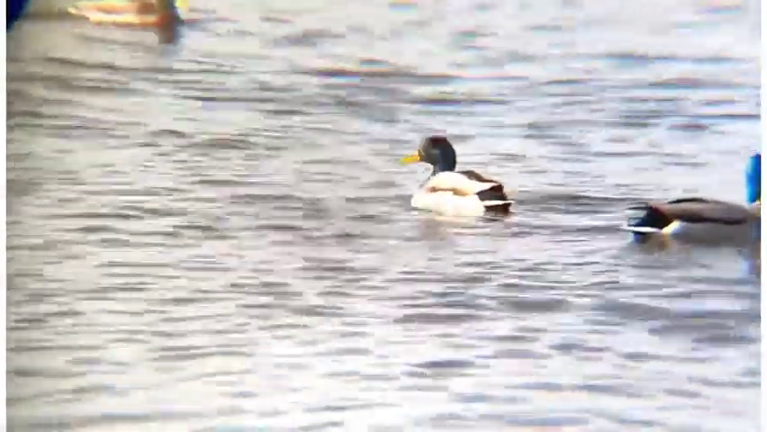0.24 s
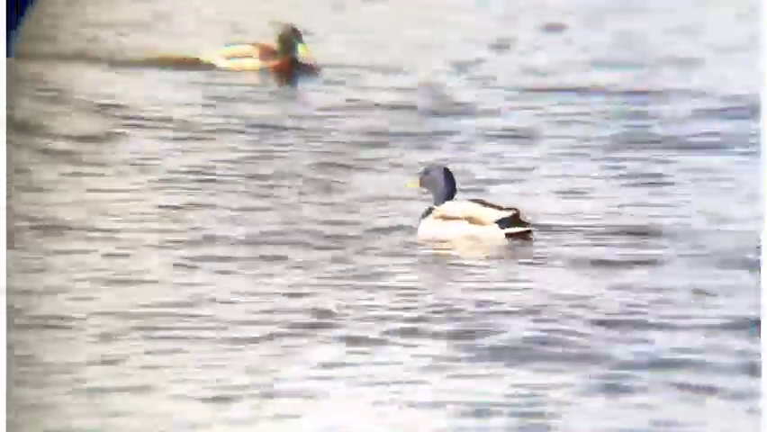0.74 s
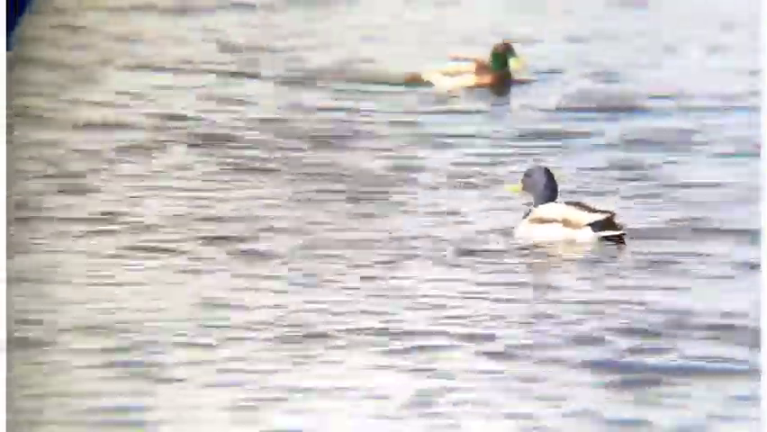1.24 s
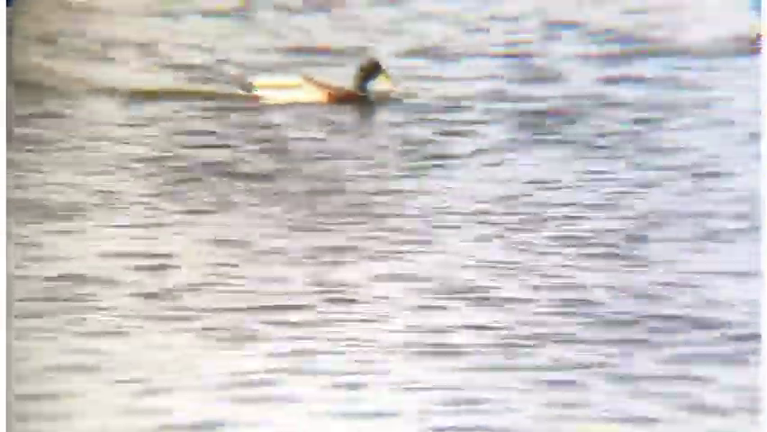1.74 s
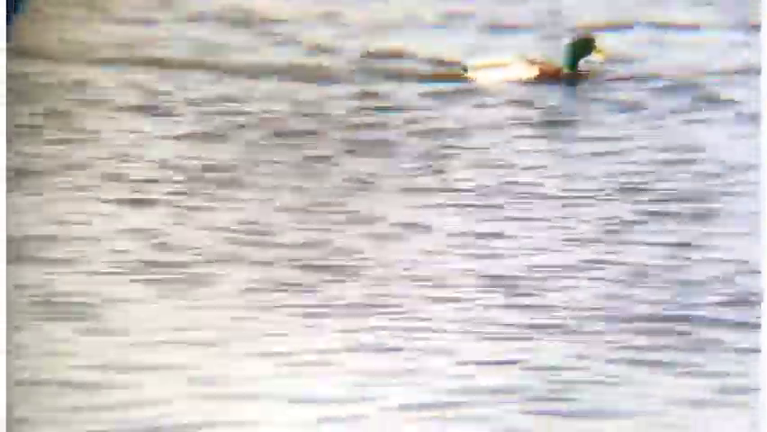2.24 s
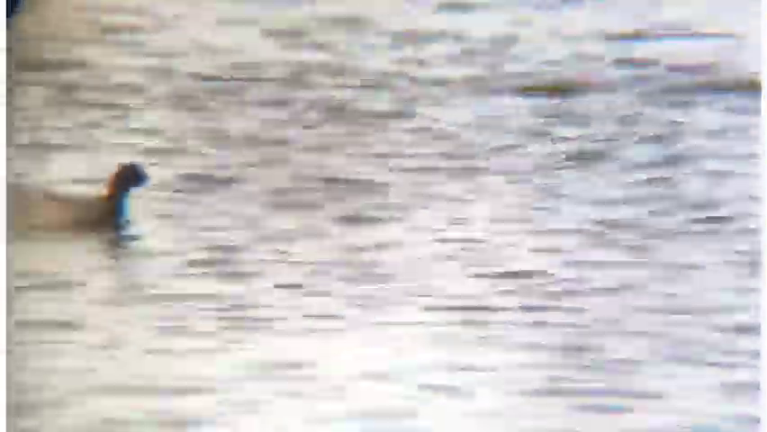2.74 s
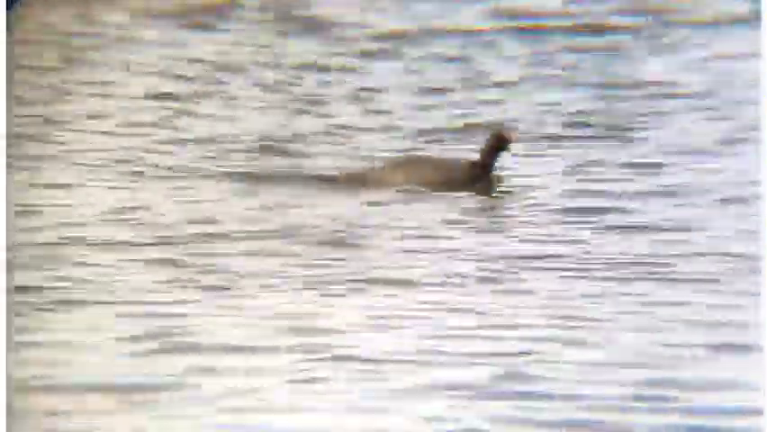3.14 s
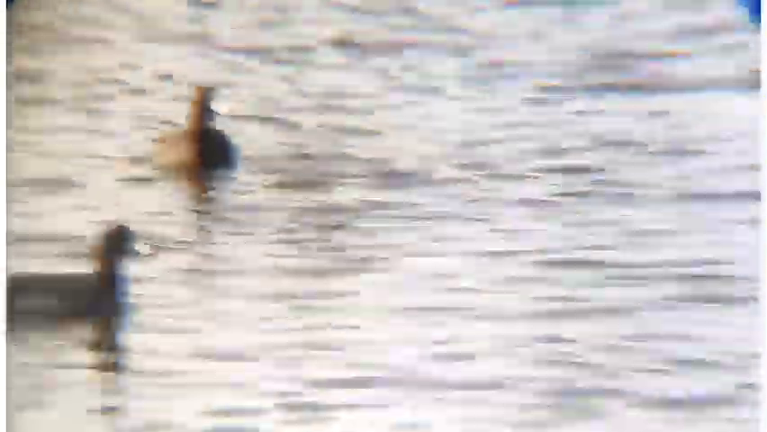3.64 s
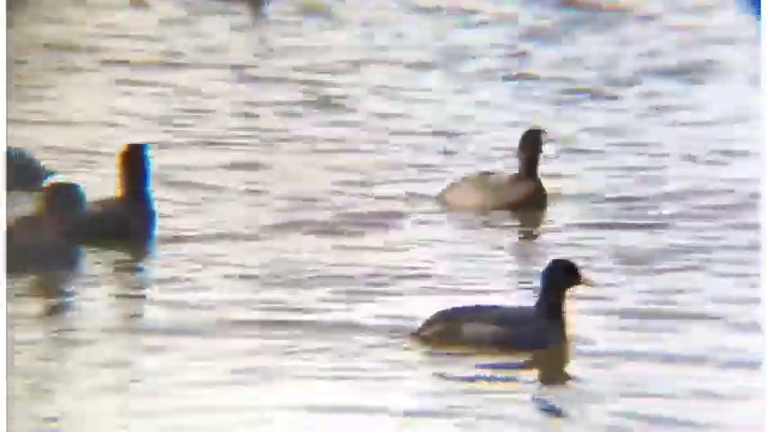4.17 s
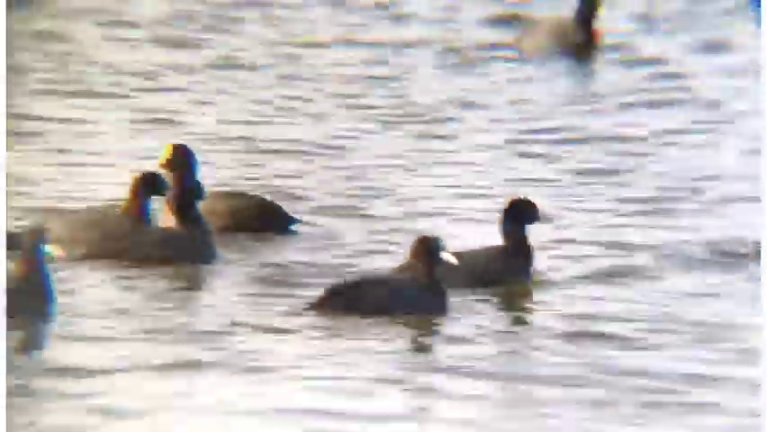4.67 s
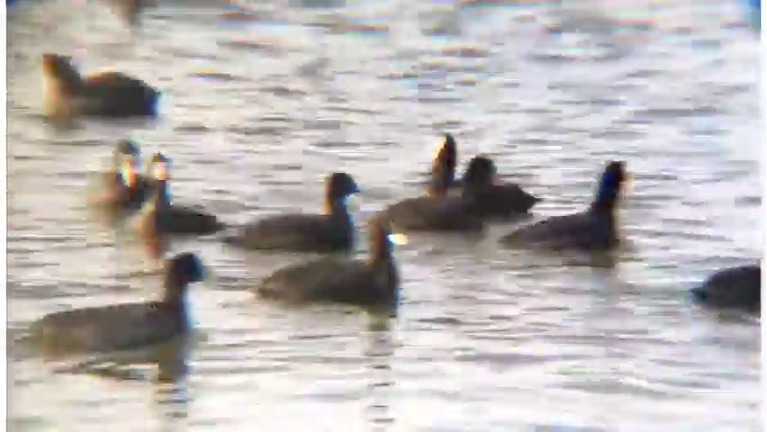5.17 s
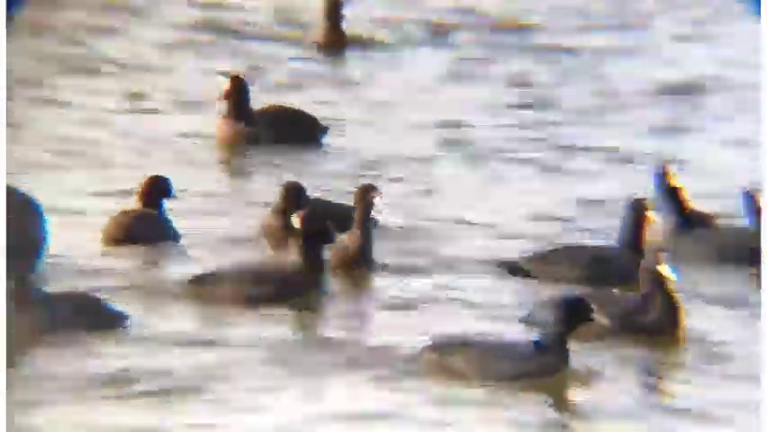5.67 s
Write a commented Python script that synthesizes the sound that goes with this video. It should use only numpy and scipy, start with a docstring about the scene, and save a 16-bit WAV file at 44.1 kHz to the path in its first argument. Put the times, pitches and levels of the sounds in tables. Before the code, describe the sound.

An open pond heard through a handheld stereo device. A quick burst of ticks and a brief low swell open it, then faint rumble and soft water wash continue, the wash slowly thinning. A coot calls at about 0.2, 0.85, 1.35, 1.8, 2.3, 2.8, 3.25, 3.7, 4.2, 4.7 and 5.2 seconds: tiny clear notes around 850 to 900 hertz, reedy with overtones, sagging slightly in pitch, some starting with a small octave break. Very short dry pops hit the right side irregularly, densest from 2.3 to 3.3 seconds. Bright rustle and finger rubs come and go, strongest early and near 4 and 4.8 seconds. Wind thumps low on the left from 2.3 to 2.8 seconds, with a weaker gust near 5.6. Two thin, distant songbird chirps come at 2.5 and 2.7. A hard plastic clack strikes at 4.85, a very faint one at 5.5, and a sharp tick near the end.

```python
"""Short, clear, falling coot notes come over an open pond, with far rumble and a wash of water behind them.
Close by, sharp taps pop in the right microphone port; the handled device rustles, ticks and clacks.
Wind buffets the left port and a far songbird chirps twice. Coot and songbird are gliding sines, rumble, wash
and rubbing are banded noise, ticks and clacks are struck resonances, taps and eddies are pressure pulses."""
import sys
import numpy as np
from scipy import signal
from scipy.io import wavfile

SR = 44100
rng = np.random.default_rng(int(sys.argv[2]) if len(sys.argv) > 2 else 0)


def volts_from_decibels(level):
    """Turn decibel levels (scalar or array-like) into linear amplitude factors."""
    exponent = np.asarray(level, float) / 20
    return 10 ** exponent


def transcribe(u):
    """Save the signal u as a 16-bit wav file named by the first command-line argument.

    u: samples, shape (n,) or (channels, n), limited to [-1, 1]; the rate is SR.
    q: integer samples, one column per channel.
    """
    v = np.clip(np.atleast_2d(u).T, -1, 1)
    q = np.round(v * 32767).astype(np.int16)
    wavfile.write(sys.argv[1], SR, q)


N = 260631   # samples

# stereo image of the distant noise: f/Hz, left-right likeness (1 = same, -1 = opposite)
PORT_LIKENESS = [(30, 1), (60, 1), (120, 1), (240, 1), (470, 0.77), (940, 0.58), (1860, 0.3), (3700, -0.14),
                 (7350, 0.49), (14600, 0.66)]
# balance of the two ports for noise: f/Hz, left over right level/dB
PORT_LEAN = [(60, 0), (150, -1.5), (370, -3), (940, 1), (2340, -3), (5850, -2), (14600, -2)]

# far rumble, spectrum shape: f/Hz, relative density level/dB per Hz
RUMBLE_SPECTRUM = [(10, 11), (20, -12.5), (40, -4), (65, 1), (112, -10.5), (200, -13), (300, -23),
                   (400, -29)]
# a steady rumble, plus a swell at the start that dies away with this time constant
RUMBLE_DB, RUMBLE_START_DB, RUMBLE_START_S = -51, -37, 0.017
# water wash, level over time: t/s, level/dB
WASH_LEVEL = [(0, -52.5), (.2, -56.5), (.54, -54), (.8, -55), (1.3, -54.5), (1.7, -53.5), (2.2, -55),
              (2.5, -55.5), (2.9, -57.5), (3.26, -56.5), (3.5, -59), (4.5, -59.5), (5.1, -57.5),
              (5.91, -60)]
# water wash, spectrum shape: f/Hz, relative density level/dB per Hz
WASH_SPECTRUM = [(120, 2.5), (200, -5), (255, 2), (311, -2), (536, -14), (575, -18), (661, -12.5),
                 (1540, -15), (3200, -32), (4160, -42), (7040, -120)]
# rustling hiss, level over time: t/s, level/dB
HISS_LEVEL = [(0, -68), (.2, -63.5), (.72, -64), (1.05, -69), (1.35, -64.5), (1.76, -65), (2.15, -68.5),
              (2.42, -64.5), (2.62, -68.5), (2.95, -66.5), (3.14, -65.5), (3.45, -71), (3.9, -68),
              (4.13, -68), (4.3, -68.5), (4.89, -67), (5.3, -68.5), (5.91, -71.5)]
# rustling hiss, spectrum shape: f/Hz, relative density level/dB per Hz
HISS_SPECTRUM = [(1290, -17.5), (2200, -0.5), (2560, -9.5), (5160, -11), (6560, -12.5), (9100, -19.5),
                 (13800, -17), (14800, -24)]
NOISE_TOP_HZ = 14650

# fingers rubbing the casing: start t/s, length/s, level/dB
RUB_SLIDES = [(.11, 0.15, -68), (0.36, 0.12, -64), (0.487, 0.037, -65.5), (0.577, 0.056, -61),
              (0.712, 0.056, -67), (1.277, 0.049, -62.5), (1.356, 0.062, -61), (1.776, 0.038, -62.5),
              (2.843, 0.023, -60), (2.914, 0.039, -63), (2.973, 0.12, -63.5), (3.695, 0.027, -59.5),
              (3.96, 0.12, -58), (4.104, 0.046, -67), (4.178, 0.05, -68), (4.666, 0.075, -65),
              (4.752, 0.033, -61), (4.835, 0.045, -56.5), (4.958, 0.031, -60), (5.163, 0.039, -63),
              (5.856, 0.015, -71)]
# rubbing, spectrum shape: f/Hz, relative density level/dB per Hz
RUB_SPECTRUM = [(880, -32), (1500, 0), (2270, 7), (2720, -12), (3440, 5), (4440, 11), (5730, -27),
                (7250, 6), (14300, -6)]
# small ticks: t/s, level/dB, left over right level/dB, colour f/Hz, decay of the crack t60/s (2 ms at least)
TICK_EVENTS = [(.014, -41, 5, 570, 0.066), (.043, -50, 3, 1390, 0.017), (0.056, -37, 8, 1000, 0.03),
               (.074, -38, -6, 730, 0.0083), (0.088, -39.5, -1.5, 1580, 0.019),
               (0.224, -42, -6, 6840, 0.045), (0.3077, -49, -2.5, 3660, .017),
               (.369, -45, 2.5, 1010, 0.0081), (0.3918, -42.5, -3.5, 3700, 0.014),
               (.498, -39.5, -6, 1250, 0.031), (1.016, -43, -6, 1670, 0.013), (1.28, -44, -6, 7200, 0.028),
               (1.336, -48.5, -3, 4600, 0.016), (1.51, -41, -7, 5300, 0.035),
               (1.8646, -44.5, -21, 7000, 0.0034), (1.928, -58, 1.5, 4240, .013),
               (2.8664, -50, -17, 8300, .008), (3.351, -48, 2, 6450, 0.023),
               (3.841, -48, -18, 7040, 0.0057), (4.567, -50.5, -19, 7300, .014),
               (4.951, -49, -17, 4030, .012), (4.9697, -50.5, -22, 4120, 0.016),
               (5.1901, -56.5, -38, 3800, .012), (5.3754, -51, -22, 6500, 0.029),
               (5.8487, -48, -10, 7200, 0.11), (5.866, -31, -11, 11800, 0.0022)]
FAINT_TICKS_PER_S, FAINT_TICK_DB = 1.2, -58   # more ticks at random moments
# casing clacks: start t/s, rms level/dB, rattle length/s
CLACK_EVENTS = [(4.8496, -31.5, 0.019), (5.482, -58.5, 0.03)]
# resonances of the plastic casing: f/Hz, relative level/dB, t60/s
CASING_MODES = [(330, -21, 0.0076), (1070, -36, 0.016), (1250, 17.5, 0.011), (1540, 0.5, 0.0068),
                (2540, -32, 0.0048), (3960, 4, 0.014), (4600, 3, 0.0077), (6700, -29, .01),
                (7230, 10.5, 0.0082), (8800, 6, 0.006), (10800, -15, .005), (11600, 2, 0.0084),
                (12700, -9, 0.0057)]

# gusts on the left port: t of peak/s, peak level/dB
GUST_PEAKS = [(1.1, -67), (1.85, -57), (2.34, -55), (2.58, -45.5), (2.78, -43.5), (2.87, -57), (5.6, -51)]
BREEZE_DB, GUST_RISE_DB_PER_S, GUST_FALL_DB_PER_S = -60.5, 261, 250
# single eddies thumping the left port: t/s, bump level/dB before the vent, width/s
EDDY_BUMPS = [(2.303, -28, 0.0023), (2.341, -28, .004), (2.356, -27, 0.0026), (2.401, -30.5, 0.0024),
              (2.505, -41, 0.0024), (2.525, -32, 0.0035), (2.752, -29, 0.0032), (2.771, -28, 0.004)]

# both birds at the two ports: f/Hz, right over left level/dB, lag of the right port/rad
BIRD_PORTS = [(810, -2, 0.82), (1710, 5.5, 0.12), (2400, 1, 1.26), (3500, 1.5, 1.6)]
# far songbird: start t/s, length/s, start f/Hz, top f/Hz, end f/Hz, loudest level/dB
BIRD_CHIRPS = [(2.535, 0.036, 4600, 5900, 5600, -67), (2.667, 0.039, 5220, 5750, 3500, -62.5)]

# taps on the right port: t/s, push level/dB without tip, contact time/ms, share of bounce, share of sharp tip
TAPS = [(0.46, -27.5, 0.068, 0.11, 0.56), (0.4623, -18, 0.0052, 0.36, 0.7), (0.7183, -33.5, 0.13, 1, 0.2),
        (0.7192, -19, 0.016, 0.09, 1.6), (1.6166, -15.5, 0.07, 0.17, 0.85),
        (1.6757, -17.5, 0.069, 0.4, 0.53), (1.9113, -15, 0.053, 0.25, 0.4),
        (2.2931, -24.5, 0.0077, 0.15, 0.55), (2.30066, -15.5, 0.032, 0.3, 2.56),
        (2.30075, -12.5, 0.016, 0.29, 0.6), (2.3474, -18, 0.074, 0.17, 0.74),
        (2.395, -14.5, 0.058, 0.24, 0.74), (2.4953, -29, 0.19, 0.1, 0.09), (2.8612, -30, 0.014, 0.2, 0.6),
        (2.888, -11.5, 0.056, 0.24, 1.33), (2.924, -21, 0.09, 0.18, 0.76), (3.0071, -21.5, 0.1, 0.16, 0.86),
        (3.116, -35, 0.3, 0.1, 0.12), (3.26, -11.5, 0.042, 0.42, 0.59), (3.8266, -27, 0.15, 0.093, 1.06),
        (3.9425, -16.5, 0.071, 0.19, 1.05), (4.3176, -17.5, 0.09, 0.035, 0.69),
        (4.4416, -18.5, 0.068, 0.24, 0.62), (4.7223, -19.5, 0.084, 0.18, 0.49),
        (5.0153, -19, 0.064, 0.24, 0.78), (5.1187, -30.5, 0.11, 0.35, 0.2),
        (5.3425, -16, 0.043, 0.53, 0.38), (5.4819, -16.5, 0.027, 0.53, 0.2),
        (5.7501, -17, 0.027, 0.51, 0.17)]
# resonances of the port cavity: f/Hz, level over the push/dB, t60/s (3 ms at most)
PORT_MODES = [(3700, -27, 0.001), (7800, -14.5, 0.004)]
PORT_CUT_HZ = 12500

# coot notes: start t/s, length/s, top f/Hz, level/dB, depth of overtone dip/dB, place of dip/share of length
COOT_NOTES = [(0.221, 0.05, 894, -48.5, 2, 0.027), (0.854, 0.065, 877, -44, 3.5, 0.41),
              (1.345, 0.028, 832, -49, 7, 0.22), (1.778, 0.058, 894, -44, 3, 0.3),
              (2.289, 0.035, 855, -45.5, 1.5, 0.25), (2.779, 0.056, 901, -43, 5, 0.35),
              (3.25, 0.033, 845, -45.5, 13, 0.089), (3.698, 0.057, 904, -46, 9, 0.38),
              (4.196, 0.053, 876, -45, 4, 0.31), (4.671, 0.058, 930, -46.5, -1, 0.45),
              (5.169, 0.032, 847, -48.5, 7, 0.46)]
# voice breaks about an octave up, before some notes:
# start t/s, length/s, start f/Hz, end f/Hz, peak level/dB, overtone over it level/dB
VOICE_BREAKS = [(0.202, 0.021, 1800, 1715, -56, -24), (1.336, 0.017, 1447, 1513, -46.5, -30),
                (2.275, 0.019, 1520, 1630, -46, -32), (3.236, 0.019, 1436, 1686, -49.5, -32),
                (5.155, 0.019, 1500, 1553, -44.5, -12.5)]
# harmonics of a note: multiple of f, level over the note's/dB, fade/dB per s, share of the dip
NOTE_HARMONICS = [(1, -2, 66, 0.074), (2, -3, 2, 1.0), (3, -8, 100, 0.95), (4, -21.5, 60, 0.35),
                  (5, -26, 160, .6), (6, -27, 162, .6), (8, -23.5, 162, 0.55)]
NOTE_ATTACK_S, NOTE_RELEASE_S, NOTE_FADE_DB = 0.0036, 0.018, 0.5
# pitch scoops up from below, then sags toward a near-common end
SCOOP_HZ, SCOOP_S, END_HZ, SAG_BEND = 31.8, 0.005, 782, 1.22
END_FOLLOWS = 0.18   # higher notes end a little higher: Hz per Hz of top pitch above 860
DIP_WIDTH = 0.097   # share of the note's length
THROAT_HZ, THROAT_WIDTH_HZ, THROAT_DB = 3430, 86, 9   # lifts an overtone that passes it


def rms_one(x):
    """Scales to rms 1."""
    return x / np.sqrt(np.mean(x ** 2) + 1e-20)


def in_time(rows, t):
    """Columns of a curve, read at times t."""
    s, *columns = np.transpose(rows)
    return [np.interp(t, s, column) for column in columns]


def at_hz(points, hz, axis=1):
    """A spectrum column, read on a log-frequency axis."""
    points = np.array(points)
    return np.interp(np.log(hz), np.log(points[:, 0]), points[:, axis])


def drift(rate):
    """Slow random wandering of rms about 1: noise smoothed by two equal poles, faster for a higher rate/Hz."""
    pole = np.exp(-80 * np.pi * rate / SR)   # runs at one fortieth of the sample rate
    white = rng.standard_normal(N // 40 + 2002)
    slow = signal.lfilter([1], [1, -2 * pole, pole * pole], white)[2000:]
    return np.interp(np.arange(N) / 40, np.arange(len(slow)), rms_one(slow))


def ring(x, hz, t60):
    """A two-pole resonance: a unit click sets a decaying sine ringing."""
    radius, turn = volts_from_decibels(-60 / (t60 * SR)), 2 * np.pi * min(hz, .45 * SR) / SR
    return signal.lfilter([0, np.sin(turn)], [1, -2 * radius * np.cos(turn), radius ** 2], x + 1e-18)


def add(out, s, piece):
    """Lays a piece into the track at time s."""
    i = max(int(s * SR), 0)
    out[..., i:i + piece.shape[-1]] += piece[..., :N - i]


def left_right(left_db, right_db):
    """Gains of the two ports."""
    return volts_from_decibels(np.array([[left_db], [right_db]]))


def banded_noise(spectrum, patchy_db, grain_db):
    """Stereo noise of rms 1 in about third-octave bands, each with its level, flicker, lean and likeness."""
    low, top = spectrum[0][0], min(spectrum[-1][0], .45 * SR)
    edges = np.geomspace(low, top, int(3 * np.log2(top / low)))
    out, together, white = 0, drift(23.5), rng.standard_normal((2, 2, N))
    for k, (a, b) in enumerate(zip(edges, edges[1:])):
        band = signal.butter(2, [a, b], "band", fs=SR, output="sos")
        mid, side = signal.sosfilt(band, white[k % 2])   # neighbouring bands use separate noise
        hz = np.sqrt(a * b)
        alike = np.clip(at_hz(PORT_LIKENESS, hz), -.99, .99)
        gain = volts_from_decibels(at_hz(spectrum, hz) + patchy_db * drift(5.2) + grain_db * together)
        lean_db = at_hz(PORT_LEAN, hz)
        stereo = np.sqrt(1 + alike) * mid + np.sqrt(1 - alike) * side * [[1], [-1]]
        out = out + gain * left_right(lean_db / 2, -lean_db / 2) * stereo
    return rms_one(out)


def partial(hz, db, turn):
    """One gliding sine from a bird; the ports hear it with unlike level and phase."""
    phase = 2 * np.pi * (np.cumsum(hz) / SR + turn)
    right = volts_from_decibels(at_hz(BIRD_PORTS, hz)) * np.sin(phase - at_hz(BIRD_PORTS, hz, axis=2))
    return np.sqrt(2) * volts_from_decibels(db) * np.array([np.sin(phase), right])


def rumble(t):
    """Far low noise, steady after the opening swell has died exponentially."""
    level = volts_from_decibels(RUMBLE_DB) + volts_from_decibels(RUMBLE_START_DB) * np.exp(-t / RUMBLE_START_S)
    return level * banded_noise(RUMBLE_SPECTRUM, patchy_db=1.7, grain_db=-1.4)


def wash(t):
    """Water wash: patchy noise, mostly low, whose level wanders."""
    return volts_from_decibels(in_time(WASH_LEVEL, t)[0]) * banded_noise(WASH_SPECTRUM, patchy_db=2.0, grain_db=2.5)


def rustle(t):
    """The handled device rustles: bright noise that comes and goes."""
    return volts_from_decibels(in_time(HISS_LEVEL, t)[0]) * banded_noise(HISS_SPECTRUM, patchy_db=.8, grain_db=.8)


def songbird():
    """Thin arched whistles: up to the top pitch where they are loudest, then down."""
    out = np.zeros((2, N))
    for (s, length, start_hz, top_hz, end_hz, db), top_at in zip(BIRD_CHIRPS, (.75, .28)):
        t = np.arange(0, length, 1 / SR)
        arch = [(0, start_hz, db - 9), (top_at * length, top_hz, db), (length, end_hz, db - 24)]
        add(out, s, partial(*in_time(arch, t), rng.random()))
    return out


def buffet(t):
    """Lumpy low pressure, mostly on the windward left port: a breeze, and gusts that swell and fall quickly."""
    band = signal.butter(2, [15, 120], "band", fs=SR, output="sos")
    low = rms_one(signal.sosfilt(band, rng.standard_normal(N)))
    push = volts_from_decibels(BREEZE_DB)
    for s, db in GUST_PEAKS:
        below_peak_db = np.where(t < s, GUST_RISE_DB_PER_S * (s - t), GUST_FALL_DB_PER_S * (t - s))
        push = push + volts_from_decibels(db - below_peak_db)
    return push * volts_from_decibels(0.32 * drift(38)) * low * left_right(0, -17)


def eddies(t):
    """Each eddy is a pressure bump; the vent, a 22 Hz high-pass, lets it swing back below rest."""
    bumps = sum(volts_from_decibels(db) * np.exp(-((t - s) / width) ** 2) for s, db, width in EDDY_BUMPS)
    return signal.lfilter(*signal.butter(1, 22, "high", fs=SR), bumps) * left_right(0, -12)


def rubs(t):
    """Dry friction: grainy bright noise that starts and stops with each slide of the fingers."""
    slide = 0
    for s, length, db in RUB_SLIDES:
        to_edge = np.minimum(t - s, s + length - t)
        slide = slide + volts_from_decibels(db) * np.clip(to_edge / 0.0067, 0, 1)
    return slide * banded_noise(RUB_SPECTRUM, patchy_db=1.5, grain_db=1.2)


def faint_ticks():
    """Rows of weak ticks at random moments, louder on the right, coloured near 4 or 7 kHz."""
    wait, level, pan, pitch, detune = rng.random((60, 5)).T
    s = np.cumsum(-np.log(1 - wait)) / FAINT_TICKS_PER_S
    db = FAINT_TICK_DB + 6 * (level - .5)
    hz = np.where(pitch < .5, 4000, 7000) * (.9 + .2 * detune)
    rows = np.c_[s, db, -18 * pan, hz, np.full(60, .011)]
    return rows[s < N / SR].tolist()


def ticks():
    """Each tick is a decaying crack of noise coloured broadly around its pitch, plus a longer ring there."""
    out, t = np.zeros((2, N)), np.arange(1500) / SR
    for s, db, pan_db, hz, t60 in TICK_EVENTS + faint_ticks():
        crack = rng.standard_normal(len(t)) * volts_from_decibels(-60 * t / max(t60, .002))
        broad, rings = ring(crack, hz, 3.9 / hz), ring(crack, hz, 0.012)
        sound = .5 * broad / abs(broad).max() + 0.25 * rings / abs(rings).max()
        add(out, s, left_right(db + pan_db / 2, db - pan_db / 2) * sound)
    return out


def clacks():
    """A blow and a quick rattle of contacts ring the plastic casing; the left port hears it first."""
    out, ms = np.zeros((2, N)), np.arange(int(.08 * SR)) / SR * 1e3
    for s, db, length in CLACK_EVENTS:
        swell = np.sin(np.pi * np.clip(ms / (length * 1e3), 0, 1) ** 1.3)
        rattle = swell * (rng.random(len(ms)) < .4)
        around_blow = np.exp(-abs(ms - 3.2) / np.where(ms < 3.2, .5, .6))
        hits = rng.standard_normal(len(ms)) * (around_blow + 1.03 * rattle)
        hits[int(3.2e-3 * SR)] = -15   # the blow itself
        casing = 0
        for hz, mode_db, t60 in CASING_MODES:
            port_db = mode_db + rng.normal(0, 0.99, (2, 1)) + [[hz / 1400], [0]]   # left is brighter
            casing = casing + volts_from_decibels(port_db) * ring(hits, hz, t60)
        scrape = rng.standard_normal((2, len(ms))) * np.clip(abs(hits), 0, 1.5)
        sound = rms_one(casing) + volts_from_decibels(-7.0) * rms_one(scrape)
        sound = signal.lfilter(*signal.butter(2, 850, "high", fs=SR), sound)   # too small to boom
        sound[1] = volts_from_decibels(4) * np.roll(sound[1], 20)   # right port: 20 samples later
        add(out, s, volts_from_decibels(db) * rms_one(sound))
    return out


def dent(ms, contact_ms, tip):
    """Inward push of one contact: a pulse slower to rise than to fall, with a very short sharp tip."""
    pulse = 1 / np.cosh(ms / np.where(ms < 0, 1.55 * contact_ms, contact_ms))
    return -pulse - tip * np.exp(-(ms / 0.011) ** 2)


def pops():
    """A tap pushes the diaphragm in and bounces once; the trapped air swings it back and the port rings."""
    push, t = np.zeros(N), np.arange(-90, 90) / SR * 1e3   # t in ms
    for s, db, contact_ms, bounce, tip in TAPS:
        late = (s * SR % 1) / SR * 1e3   # part of a sample, in ms
        first = dent(t - late, contact_ms, tip)
        second = dent(t - late - .306, contact_ms, tip)
        add(push, s + t[0] / 1e3, volts_from_decibels(db) * (first + bounce * second))
    ms = np.arange(200) / SR * 1e3
    swing = np.sin(np.pi * np.clip((ms - .18) / 0.94, 0, 1)) ** 0.54
    undershoot = np.clip(ms - 1.05, 0, 9) * np.exp(-ms / 0.083)   # short, after the swing
    back = 1.78 * swing / swing.sum() - 0.13 * undershoot / undershoot.sum()
    push = signal.lfilter(*signal.butter(2, PORT_CUT_HZ, fs=SR), push)
    out = push - np.convolve(push, back)[:N]
    out = out + sum(volts_from_decibels(db) * ring(push, hz, min(t60, .003)) for hz, db, t60 in PORT_MODES)
    return out * left_right(-40, 0)


def bank_echoes(x):
    """Ten faint scattered reflections off the bank, all within 50 ms."""
    echoes = np.zeros((2, int(.05 * SR)))
    delays = (rng.uniform(.006, .05, 10) * SR).astype(int) - 1
    echoes[:, delays] = volts_from_decibels(-41) * rng.standard_normal((2, 10))
    return signal.fftconvolve(x, echoes, axes=1)[:, :N]


def coot():
    """Falling harmonic notes with a slight waver, a throat resonance, octave breaks and echoes off the bank."""
    out, waver, shimmer = np.zeros((2, N)), drift(120), drift(82)
    for s, length, top_hz, db, dip_db, dip_at in COOT_NOTES:
        age = np.arange(0, length, 1 / SR)
        at, u = ((s + age) * SR).astype(int), age / length
        fall_hz = top_hz - END_HZ - END_FOLLOWS * (top_hz - 860)
        hz = top_hz - fall_hz * u ** SAG_BEND - SCOOP_HZ * np.exp(-age / SCOOP_S)
        hz = hz * (1 + .0045 * waver[at])
        attack = np.clip(age / NOTE_ATTACK_S, 0, 1) ** 2
        release = np.clip((length - age) / NOTE_RELEASE_S, 0, 1) ** 0.64
        dip = dip_db * np.exp(-((u - dip_at) / DIP_WIDTH) ** 2)
        note = 0
        for k, rel_db, fade, share in NOTE_HARMONICS:
            throat = THROAT_DB / (1 + ((k * hz - THROAT_HZ) / THROAT_WIDTH_HZ) ** 2)
            level = db - NOTE_FADE_DB * u + rel_db - fade * age - share * dip + throat
            level = level + 2.03 * shimmer[at - 300 * k]   # each harmonic shimmers at its own time
            note = note + partial(k * hz, level, 0.19)
        add(out, s, attack * release * note)
    for s, length, start_hz, end_hz, db, over_db in VOICE_BREAKS:
        u = np.linspace(0, 1, int(length * SR))
        hz = start_hz + (end_hz - start_hz) * u
        tone = partial(hz, db, 0.16) + partial(2 * hz, db + over_db, 0.097)
        add(out, s, np.sin(np.pi * u ** 2.15) * tone)
    return out + bank_echoes(out)


def scene():
    """Far noises and handling end near 14.65 kHz; wind, birds and taps are added."""
    t = np.arange(N) / SR
    noises = rumble(t) + wash(t) + rustle(t) + rubs(t) + ticks() + clacks()
    low_pass = signal.cheby2(16, 50, NOISE_TOP_HZ, fs=SR, output="sos")
    out = signal.sosfilt(low_pass, noises)
    return out + songbird() + buffet(t) + eddies(t) + pops() + coot()


def top_cut(x):
    """Nothing passes above the cut-off."""
    return signal.sosfilt(signal.butter(12, 15210, fs=SR, output="sos"), x)


def record(dry):
    """Takes the mix of both ports as it stands to its delivered form."""
    return top_cut(dry)


dry = scene()
out = record(dry)
transcribe(out)
```